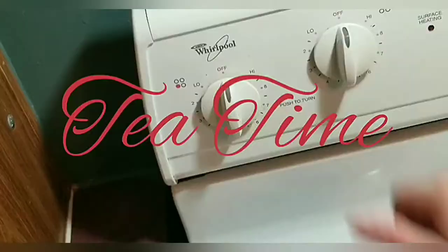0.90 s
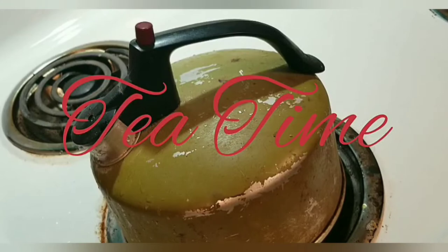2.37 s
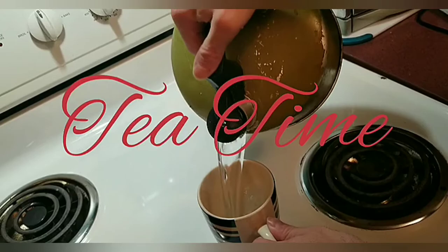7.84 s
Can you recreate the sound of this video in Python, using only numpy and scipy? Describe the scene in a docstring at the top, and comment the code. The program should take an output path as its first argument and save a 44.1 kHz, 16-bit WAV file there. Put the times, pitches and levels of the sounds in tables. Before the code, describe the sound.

Four moments of making tea follow one another abruptly, close to the microphone in a small kitchen with a faint rumble. First come the clanks and thuds of a kettle settling on a stove burner, with a slight rustle of cloth. A control knob gives a few quiet clicks. Then a shrill, wavering kettle whistle climbs over hissing steam and stops dead, before water drips, spatters and gurgles into a cup.

```python
"""An enamelled kettle clatters onto the coil of an electric stove, steel ringing over a booming top.
A sleeve rustles and the burner knob clicks round. Steam sings through the spout whistle, ragged
and rising in pitch; then water splashes and gulps into a cup. Four moments of making tea in a
small kitchen, switching abruptly from one to the next, heard close by in mono over a low rumble."""
import sys
import numpy as np
from scipy import signal
from scipy.fft import rfft, irfft, next_fast_len
from scipy.io import wavfile
from scipy.ndimage import uniform_filter1d

SR = 44100
rng = np.random.default_rng(int(sys.argv[2]) if len(sys.argv) > 2 else 0)


def store_wav(level_fs):
    """Save 16-bit WAV to argv[1]."""
    pcm = np.round(np.clip(np.atleast_2d(level_fs), -1, 1) * 32767)
    wavfile.write(sys.argv[1], SR, pcm.T.astype(np.int16))


N = 366471
TIME = np.arange(N) / SR
# when each moment is heard: start_s, end_s
STOVE_SPAN, KNOB_SPAN, BOIL_SPAN, POUR_SPAN = (-1, 2.042), (2.042, 3.516), (3.516, 7.324), (7.356, 9)


def from_db(db):
    """Decibels to gain."""
    return 10 ** (np.asarray(db) / 20)


def unit_rms(x):
    """Scale to unit power."""
    return x / np.sqrt(np.mean(x ** 2) + 1e-20)


def automation(rows):
    """Turn timed breakpoints into one curve per column, sample by sample."""
    times, *columns = np.transpose(rows)
    return [np.interp(TIME, times, column) for column in columns]


def drift(rate_hz):
    """A smooth random wobble of rms 1, mostly slower than rate_hz."""
    size = 2 ** 15
    hz = np.arange(size // 2 + 1) * SR / N
    slow = irfft(rfft(rng.standard_normal(size)) / (1 + (hz / rate_hz) ** 2))
    return np.interp(np.arange(N) * size / N, np.arange(size), unit_rms(slow))


def colour(x, spectrum):
    """EQ a sound with a curve drawn on a log-frequency axis; rms 1."""
    size = next_fast_len(len(x), True)
    hz = np.arange(size // 2 + 1) * SR / size
    freq_hz, level_db = np.transpose(spectrum)
    gain = from_db(np.interp(np.log(np.maximum(hz, 1)), np.log(freq_hz), level_db))
    return unit_rms(irfft(rfft(x, size) * gain * (hz > 20), size)[:len(x)])


def add(out, start_s, sound):
    """Mix a sound in at start_s."""
    start = max(round(start_s * SR), 0)
    out[start:start + len(sound)] += sound[:N - start]


def decay(t60, size):
    """An envelope that loses 60 dB in t60 seconds."""
    return from_db(-60 * np.arange(size) / SR / max(t60, .002))


def gate(span):
    """Open for the span, with 3 ms fades."""
    return uniform_filter1d(((TIME > span[0]) & (TIME < span[1])).astype(float), size=128)


def struck_modes(times, level_db, modes, scatter_db):
    """Each blow sets every mode ringing as a dying sine; scatter_db varies their strengths."""
    out = np.zeros(N)
    onsets = np.round(times * SR).astype(int)
    for hz, mode_db, t60 in modes:
        clicks = np.zeros(N)
        clicks[onsets] = from_db(level_db + mode_db + scatter_db * rng.standard_normal(len(times)))
        radius, angle = from_db(-60 / (t60 * SR)), 2 * np.pi * hz / SR
        feedback = [1, -2 * radius * np.cos(angle), radius * radius]
        out += signal.lfilter([0, np.sin(angle)], feedback, clicks + 1e-18)
    return out


def blows(rows, body, crack_db, crack_t60, bass_hold):
    """Countless close modes: a crack, then a ring in three registers; soft contacts lose the top."""
    out, size = np.zeros(N), SR * 3 // 5
    edges_hz = [40, 300], [300, 1200], [1200, 16000]
    registers = [signal.butter(2, edges, "band", fs=SR, output="sos") for edges in edges_hz]
    crack = from_db(crack_db) * decay(crack_t60, size)
    for start_s, thud_db, clang_db, clash_db, bright_hz, t60 in rows:
        contact = signal.butter(2, min(bright_hz, SR * 2 / 5), fs=SR, output="sos")
        for band, db, hold in zip(registers, (thud_db, clang_db, clash_db), (bass_hold, 1, 1)):
            noise = colour(rng.standard_normal(size), body)
            ring = unit_rms(signal.sosfilt(np.vstack([band, contact]), noise))
            add(out, start_s, from_db(db) * ring * (decay(t60 * hold, size) + crack))
    return out


def kitchen_reverb(x, wet_db, t60):
    """Direct sound plus dense reflections that arrive from 3 ms later."""
    size = SR // 2
    echoes = rng.standard_normal(size) * decay(t60, size) * (TIME[:size] > .003)
    return x + from_db(wet_db) * signal.fftconvolve(x, echoes / np.linalg.norm(echoes))[:N]


def room_tone():
    """The kitchen's steady low rumble."""
    # rumble spectrum: freq_hz, level_db
    rumble = [(25, -16.5), (45, -1), (65, -4.5), (90, -20.5), (120, -14.5), (200, -29.5), (400, -36),
              (1000, -47), (3000, -52.5), (15500, -44)]
    return from_db(-57) * colour(rng.standard_normal(N), rumble)


def sleeve(flicker_db=3):
    """Cloth rubs in small uneven slips as the hand moves to the knob."""
    # swell of the rustle: time_s, level_db
    swell = [(0.9, -72.5), (0.95, -67.5), (1.02, -63), (1.1, -65.5), (1.25, -63.5), (1.85, -65),
             (2.04, -55.5)]
    # cloth spectrum: freq_hz, level_db
    cloth = [(2500, -19.5), (4200, 2.5), (6000, -1), (9000, -7.5), (15500, -13)]
    level_db, = automation(swell)
    return from_db(level_db + flicker_db * drift(40)) * colour(rng.standard_normal(N), cloth)


def burner_knob(thud_db=-80, bright_hz=12060, t60=.26):
    """The detent spring snaps and the hollow control panel answers, over a faint hiss."""
    # clicks of the knob: start_s, clunk_db, snap_db
    detents = [(2.237, -74, -49.5), (2.738, -74, -47), (2.85, -51.5, -51), (3.249, -70, -49.5),
               (3.394, -50.5, -52)]
    # the panel's dense ring: freq_hz, level_db
    panel = [(60, 5), (300, -15.5), (500, -7), (650, -19), (880, 2), (1150, -8), (1430, -6), (1900, -12),
             (2500, -4.5), (3100, -5), (3900, -1.5), (6000, 3), (9000, -2.5), (15500, 2.5)]
    # its clearest modes: pitch_hz, level_db, t60_s
    panel_modes = [(880, -3, .3), (1450, -8, .2), (2180, -12, .2)]
    # high hiss: freq_hz, level_db
    hiss = [(4400, -25), (4950, 1.5), (6500, -13), (9000, -0.5), (14000, 1), (15700, -3.5)]
    rows = [(start_s, thud_db, clunk, snap, bright_hz, t60) for start_s, clunk, snap in detents]
    clicks = from_db(-2) * blows(rows, panel, crack_db=-31, crack_t60=.029, bass_hold=1.5)
    times, clunk_db, snap_db = np.transpose(detents)
    ring = struck_modes(times, np.maximum(clunk_db - 4, snap_db - 12), panel_modes, scatter_db=1.5)
    return clicks + ring + from_db(-67.5) * colour(rng.standard_normal(N), hiss)


def skid_ring(hz, t60, skid_db):
    """One ring; the contact skids briefly, so a scratchy band surrounds it."""
    band = signal.butter(2, [hz * 7 / 8, hz * 8 / 7], "band", fs=SR, output="sos")
    skid = unit_rms(signal.sosfilt(band, rng.standard_normal(SR))) * decay(t60 + .03, SR)
    ring = np.sin(2 * np.pi * hz * TIME[:SR]) * decay(t60, SR)
    return (ring + from_db(skid_db) * skid) / 2


def kettle_on_stove():
    """The kettle lands, rocks and settles; coil and stove body ring under it."""
    # kettle against coil and stove top: start_s, thud_db, clang_db, hardness (0-1), t60_s
    knocks = [(0.002, -40, -29, 1, 0.42), (0.041, -41, -33, 0.2, 0.66), (0.099, -56, -30, 0.97, 0.14),
              (0.306, -70, -53.5, 1, 0.29), (0.349, -61, -52, 0.72, 0.5), (0.538, -69.5, -59.5, .35, 0.85),
              (0.579, -63, -65, 1, 0.1), (0.744, -54.5, -60.5, 0.74, 0.5),
              (0.782, -52.5, -52.5, 0.36, 0.42), (1.128, -39, -51, 0.17, 0.58),
              (1.262, -45, -47, 0.4, 0.64), (1.282, -36, -43.5, 0.42, 0.65), (1.340, -36, -29, 0.66, 0.41),
              (1.408, -41.5, -36.5, 0.29, 0.28), (1.58, -55, -40.5, 0.7, 0.19),
              (1.629, -54, -43.5, 0.8, 0.15), (1.687, -59, -44.5, 0.75, 0.2),
              (1.717, -42, -46.5, 0.41, 0.39), (1.97, -32.5, -48, 0.37, 1)]
    # the steel's dense ring: freq_hz, level_db
    steel = [(40, 19.5), (130, 14.5), (270, 3), (480, 3.5), (750, 2.5), (1150, 0), (1550, -3), (2100, -7.5),
             (2700, -7), (3400, -9), (4500, -5), (7000, -8.5), (11000, -4), (15500, 1.5)]
    # its clearest modes: pitch_hz, level_db, t60_s
    steel_modes = [(447, -11, .3), (662, -7, .28), (1206, -10, .3), (1367, -10, .3), (1491, 0, .21),
                   (1771, -5, .26), (1916, -4, .26), (2078, -5, .26), (3510, -16, .25)]
    # the hollow top booms, tuned by where the weight lands: start_s, level_db, pitch_hz, t60_s
    booms = [(0.061, -15.5, 78, 0.055), (0.778, -35.5, 141, 0.15), (1.127, -26, 295, 0.18),
             (1.26, -31, 720, 0.06), (1.285, -24, 1097, 0.032), (1.339, -8, 220, 0.024),
             (1.582, -27.5, 684, 0.057), (1.975, -19.5, 167, 0.25)]
    # the base squeaks on the coil: start_s, level_db, pitch_hz
    squeaks = [(0.346, -31, 4200), (0.395, -44, 4080), (0.435, -49, 4630), (0.489, -44, 3710),
               (0.722, -51, 3940)]
    # a squeak's partials: pitch_ratio, level_db
    squeak_modes = [(1, 0), (1.86, -9), (3.3, -12)]
    times, thud_db, clang_db, hardness, ring_t60 = np.transpose(knocks)
    # a harder contact is brighter
    clash_db = clang_db - 12.5 + 19 * hardness
    bright_hz = 1500 * 2 ** (1.64 * hardness)
    rows = zip(times, thud_db, clang_db, clash_db, bright_hz, ring_t60)
    out = from_db(-1.5) * blows(rows, steel, crack_db=-2, crack_t60=.017, bass_hold=2.53)
    # only a blow with both weight and bite wakes the clear modes; light ones stay dry
    force_db = np.minimum(thud_db, clash_db)
    wake_db = force_db + (force_db - force_db.max())
    out += struck_modes(times, wake_db + 8, steel_modes, scatter_db=0)
    for start_s, db, hz, t60 in booms:
        add(out, start_s, from_db(db) * skid_ring(hz, t60, skid_db=-5))
    for start_s, db, hz in squeaks:
        for ratio, mode_db in squeak_modes:
            add(out, start_s, from_db(db + mode_db) * skid_ring(hz * ratio, t60=.09, skid_db=-4))
    return out


def bubble(hz, cycles):
    """A pocket of air swells within a cycle or so, rings and dies."""
    t = TIME[:2048]
    return np.sin(2 * np.pi * hz * t) * (1 - np.exp(-hz * t)) * decay(cycles / hz, len(t))


def glugs(hollow_db, count=36, lowest_hz=340):
    """Large pockets of air wobble up at random, an octave wide, below the hollow's own pitch."""
    out = np.zeros(N)
    for when, octaves in rng.random((count, 2)):
        start_s = POUR_SPAN[0] + when * (TIME[-1] - POUR_SPAN[0])
        db = hollow_db[round(start_s * SR)] - 3
        add(out, start_s, from_db(db) * bubble(lowest_hz * 2 ** octaves, cycles=18))
    return out


def fizz(splash_db, count=520, lowest_hz=2000):
    """Tiny bubbles ping at random over two octaves, riding the level of the splash."""
    out = np.zeros(N)
    for when, pitch, strength in rng.random((count, 3)):
        start_s = POUR_SPAN[0] + when * (TIME[-1] - POUR_SPAN[0])
        db = splash_db[round(start_s * SR)] - 3 + 4.9 * strength ** 2
        add(out, start_s, from_db(db) * bubble(lowest_hz * 4 ** pitch, cycles=18))
    return out


def pour(drops_per_s=4000, spread_db=7):
    """The stream spatters and fizzes in the cup; gulps of air ring in its hollow."""
    # the hollow speaks once the full stream lands: time_s, splash_db, hollow_db
    flow = [(7.37, -70.5, -65), (7.79, -56, -71.5), (7.994, -37.5, -48), (8.014, -41, -37),
            (8.056, -40, -43), (8.124, -38, -30.5), (8.282, -48, -47), (8.298, -51, -45), (8.31, -47, -32)]
    # splash spectrum: freq_hz, level_db
    splash = [(500, -24), (1400, -39), (2400, -4.5), (3200, -5.5), (4900, -5), (6000, -10.5), (9000, -12),
              (15500, -18)]
    # the cup's hollow resonance: freq_hz, level_db
    cup = [(150, -35), (380, -14), (600, 4), (720, 5), (830, 15), (1040, 15), (1200, 2), (1500, 8),
           (2200, -5), (4000, -47)]
    # big gulps of air pulled under: start_s, level_db, pitch_hz
    gulps = [(8.005, -31, 900), (8.015, -23, 1510), (8.092, -16.5, 965), (8.123, -19, 970),
             (8.161, -21, 1055), (8.234, -22, 948), (8.296, -26.5, 1020)]
    # first drips and big splats: start_s, level_db, pitch_hz
    drips = [(7.4875, -53, 2130), (7.6828, -43, 4370), (7.827, -35, 3270), (7.932, -33, 4370),
             (7.964, -37, 3900), (8.0144, -27.5, 2230), (8.1242, -28.5, 2940), (8.296, -28.5, 5100)]
    splash_db, hollow_db = automation(flow)
    impacts = from_db(spread_db * np.minimum(rng.exponential(1, N), 4)) * rng.choice([-1, 1], N)
    drops = impacts * (rng.random(N) < drops_per_s / SR)
    out = from_db(splash_db - 4) * colour(drops, splash) + from_db(hollow_db - 3) * colour(drops, cup)
    out += glugs(hollow_db) + fizz(splash_db)
    for start_s, db, hz in gulps:
        add(out, start_s, from_db(db + 1) * bubble(hz, cycles=30))
    for start_s, db, hz in drips:
        spray = from_db(-6) * colour(rng.standard_normal(2048), splash) * decay(t60=.089, size=2048)
        add(out, start_s, from_db(db - 2) * (bubble(hz, cycles=105) + spray))
    return kitchen_reverb(out, wet_db=-6.5, t60=.34)


def steam(level_db=-39.5, gust_db=.86):
    """The jet rushes round the whistle's tone."""
    # jet spectrum: freq_hz, level_db
    jet = [(60, -4.5), (120, 1), (170, 5), (260, 2), (500, 2), (1000, 3.5), (1700, 0.5), (2800, -2.5),
           (4200, 2), (5800, -1), (7500, -9), (11000, -10.5), (15500, -16.5)]
    return from_db(level_db + gust_db * drift(54)) * colour(rng.standard_normal(N), jet)


def whistle(hop_depth=.0115, wander=.0048, jitter=.0055, flutter_db=1.5, partial_flutter_db=.2):
    """Vortices shed between two plates lock into a tone; turbulence shakes its pitch and strength."""
    # the pitch climbs with the head of steam: time_s, pitch_hz
    climb = [(3.53, 1673), (3.78, 1790), (3.89, 1732), (4.07, 1813), (4.14, 1948), (4.17, 1846),
             (4.24, 1941), (4.34, 1832), (4.36, 1947), (4.66, 2016), (4.72, 1997), (4.79, 2056),
             (4.84, 1923), (4.98, 2078), (5.08, 2010), (5.38, 2194), (5.41, 2100), (5.49, 2224),
             (5.61, 2245), (6.09, 2110), (6.26, 2227), (6.34, 2146), (6.62, 2212), (6.66, 2122),
             (6.76, 2246), (7.1, 2274), (7.13, 2345), (7.32, 2306)]
    # each pitch voices the lowest partials its own way: pitch_hz, first_db, second_db, third_db
    voicing = [(1693, -36, -29.5, -35), (1840, -38, -22.5, -32), (1880, -34, -26, -31),
               (2040, -29, -30.5, -34), (2159, -33.5, -32, -31.5), (2219, -27.5, -24, -33.5),
               (2272, -30.5, -28, -32)]
    # higher partials against the third: harmonic, level_db
    overtones = [(4, -14.5), (5, -20), (6, -30)]
    # ragged spurts as the tone catches and overblows: centre_s, half_width_s, roughness (0-1)
    spurts = [(3.575, 0.16, 0.7), (7.22, 0.055, 0.95)]
    pitch_hz, = automation(climb)
    voiced_hz, *levels = np.transpose(sorted(voicing))
    first_db, second_db, third_db = [np.interp(pitch_hz, voiced_hz, level) for level in levels]
    hop = np.tanh(4 * (drift(20) - .5))   # up to a neighbouring pitch and back
    spurt = sum(depth * np.exp(-((TIME - centre_s) / width_s) ** 2) for centre_s, width_s, depth in spurts)
    pressure = drift(40)
    bend = hop_depth * (hop - hop.mean()) * (1 + spurt) + wander * pressure + jitter * drift(250)
    phase = 2 * np.pi * np.cumsum(pitch_hz * (1 + bend)) / SR
    # a faster jet sings higher and feeds the top partials more
    drive_db = 16 * np.log2(pitch_hz / np.median(pitch_hz[TIME > climb[0][0]]))
    sputter_db = 16.5 * spurt * (1 + hop / 2)
    partials = [(1, first_db - .5 - sputter_db), (2, second_db - .5), (3, third_db - .5 - sputter_db)]
    partials += [(k, third_db + db + np.sqrt(k - 3) * drive_db) for k, db in overtones]
    tone = 0
    for k, db in partials:
        # in spurts, mid-hop and in high partials, the locked tone frays into a narrow band of noise
        rough = np.clip(np.hypot(.12 * k, spurt + .35 * (1 - hop ** 2)), 0, .95)
        locked = np.sqrt(2 * (1 - rough ** 2)) * np.sin(k * phase)
        fray = drift(100) * np.cos(k * phase) + drift(90) * np.sin(k * phase)
        tone += from_db(db + partial_flutter_db * np.sqrt(k) * drift(63)) * (locked + rough * fray)
    # reflections of the wavering tone beat with it, so each partial fades on its own
    return from_db(-2) * kitchen_reverb(tone * from_db(flutter_db * pressure), wet_db=1, t60=.16)


def scene():
    """The four moments in turn over the room tone, alike in both ears."""
    gap = gate((BOIL_SPAN[1], POUR_SPAN[0]))   # a blink of silence before the pour
    out = room_tone() * (1 - gap)
    out += (kettle_on_stove() + sleeve()) * gate(STOVE_SPAN)
    out += burner_knob() * gate(KNOB_SPAN)
    out += (whistle() + steam()) * gate(BOIL_SPAN)
    out += pour() * gate(POUR_SPAN)
    return np.stack([out, out])


def record(dry):
    """A steep low-pass takes off the very top."""
    cutoff_hz = 15600
    return signal.sosfilt(signal.ellip(10, .1, 80, cutoff_hz, fs=SR, output="sos"), dry)


dry = scene()
out = record(dry)
store_wav(out)
```